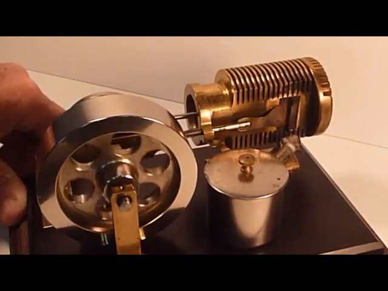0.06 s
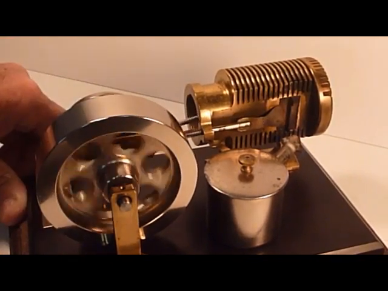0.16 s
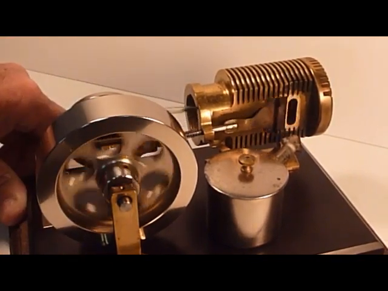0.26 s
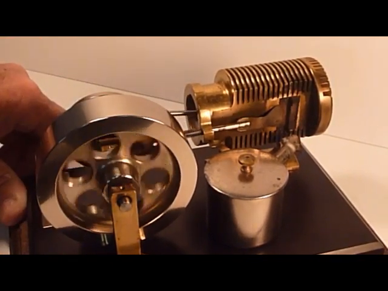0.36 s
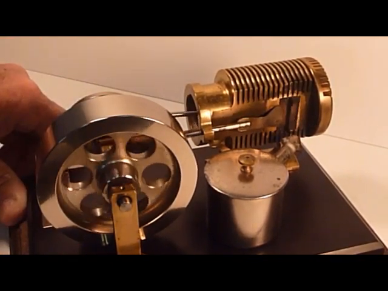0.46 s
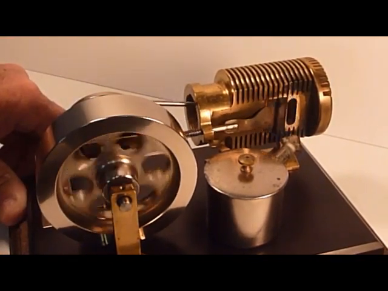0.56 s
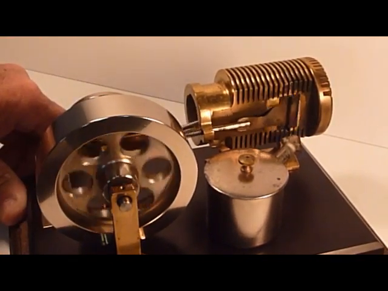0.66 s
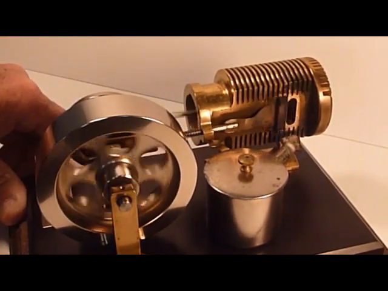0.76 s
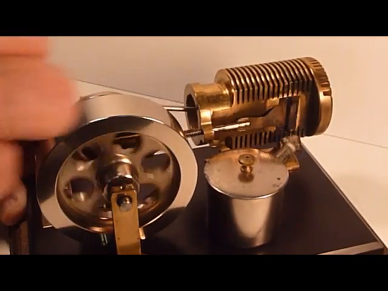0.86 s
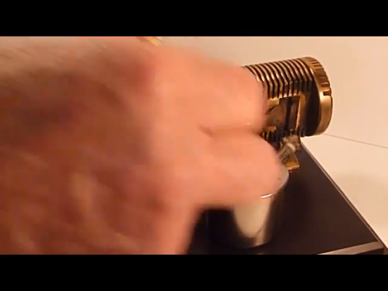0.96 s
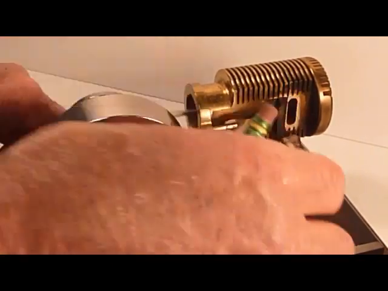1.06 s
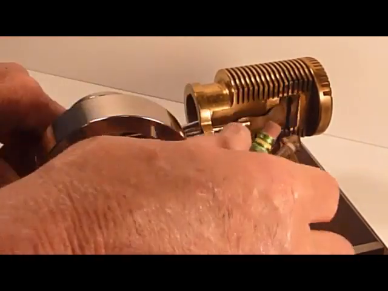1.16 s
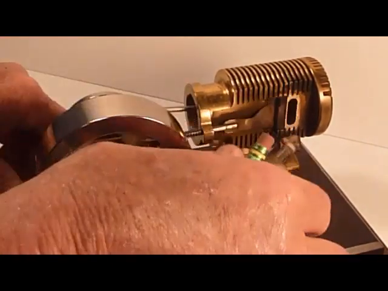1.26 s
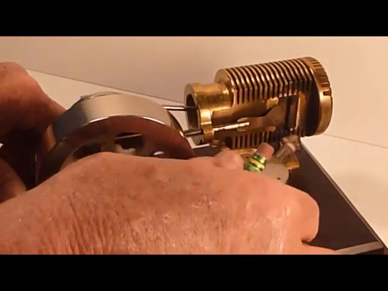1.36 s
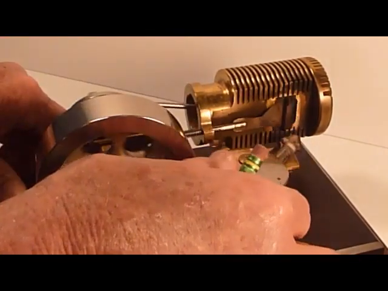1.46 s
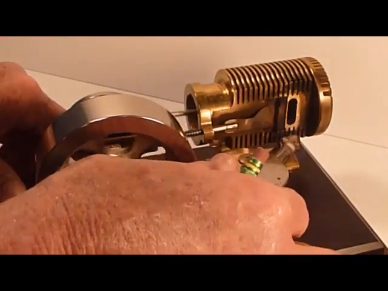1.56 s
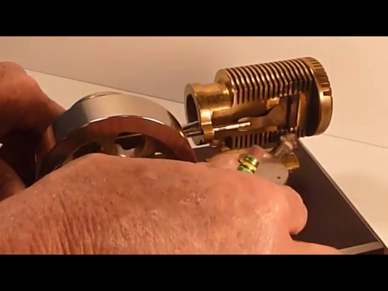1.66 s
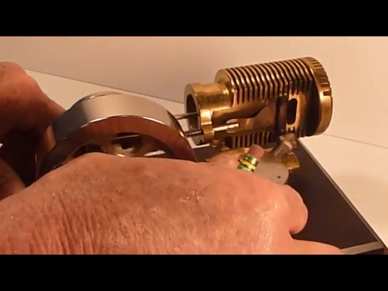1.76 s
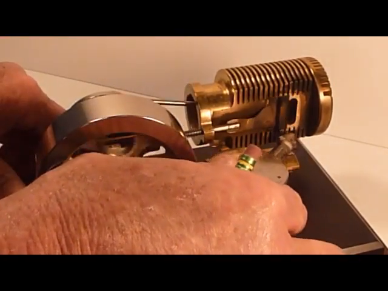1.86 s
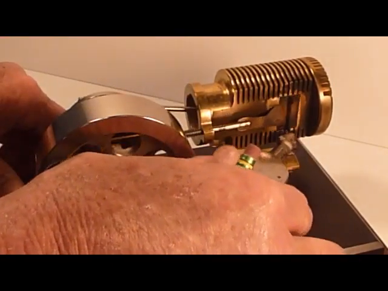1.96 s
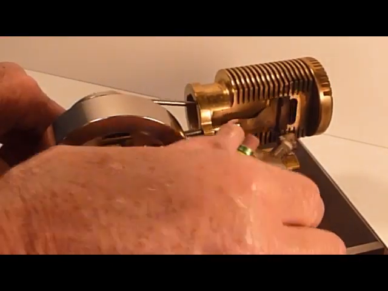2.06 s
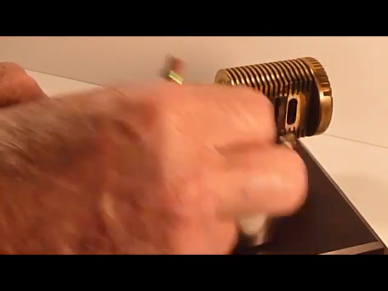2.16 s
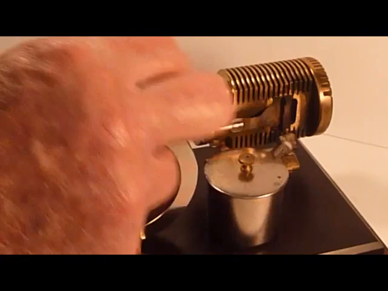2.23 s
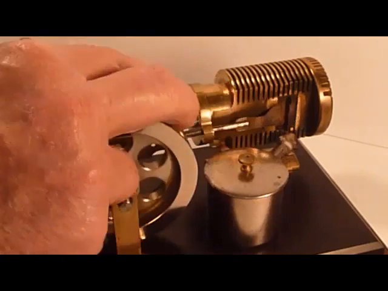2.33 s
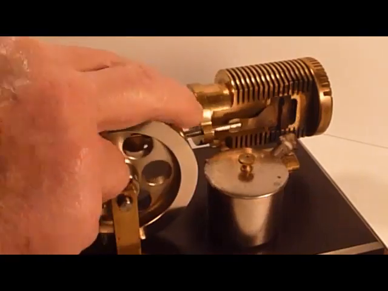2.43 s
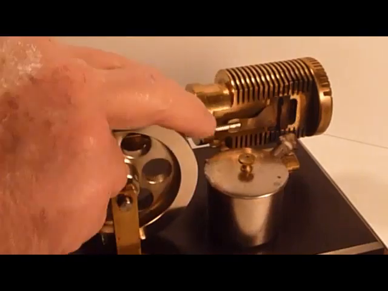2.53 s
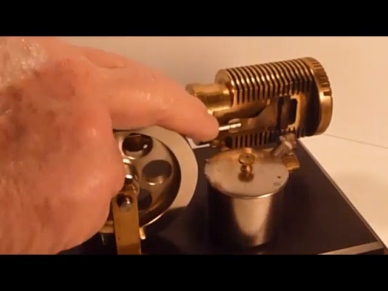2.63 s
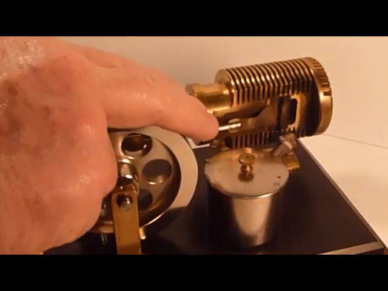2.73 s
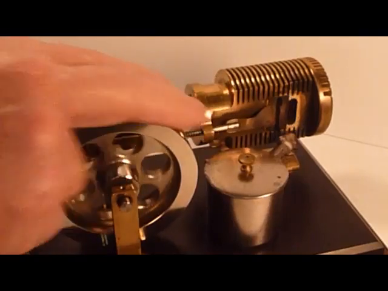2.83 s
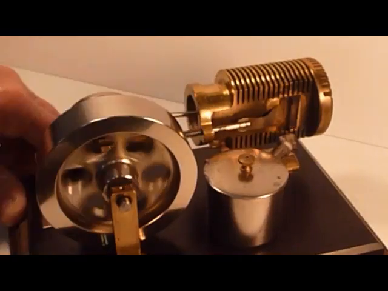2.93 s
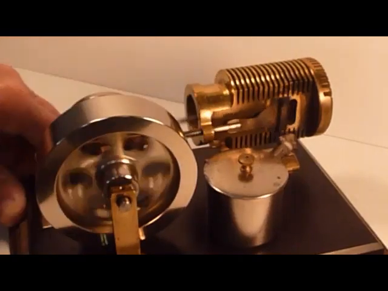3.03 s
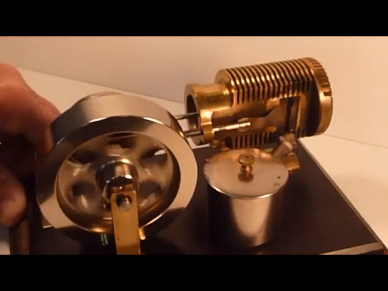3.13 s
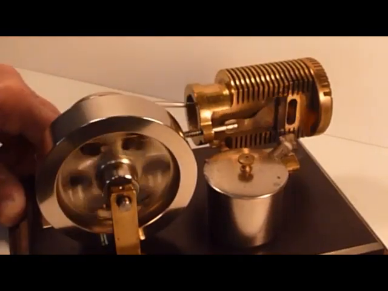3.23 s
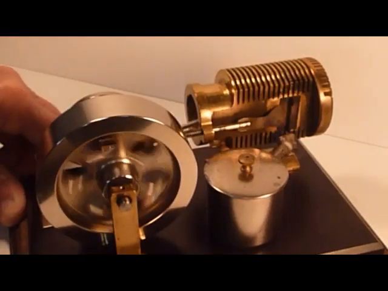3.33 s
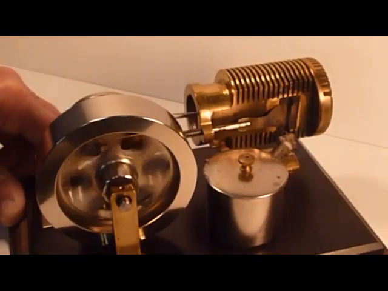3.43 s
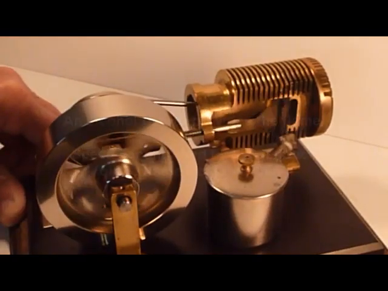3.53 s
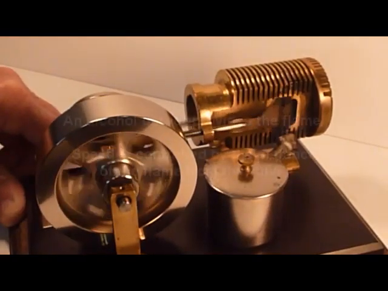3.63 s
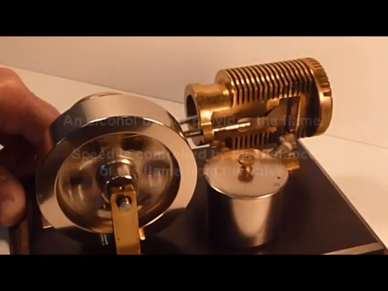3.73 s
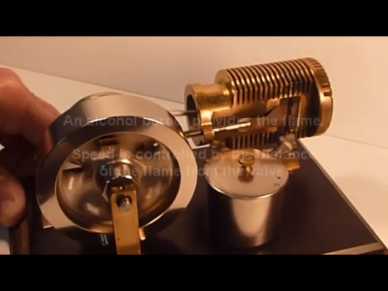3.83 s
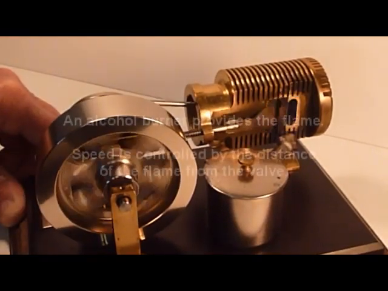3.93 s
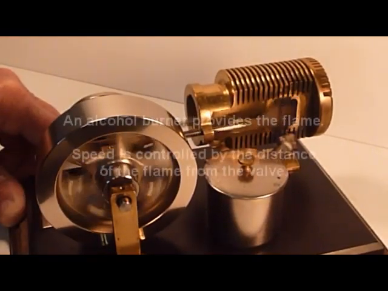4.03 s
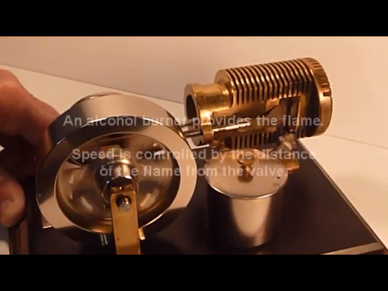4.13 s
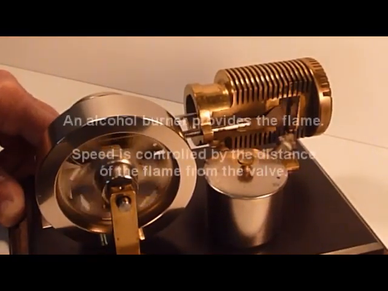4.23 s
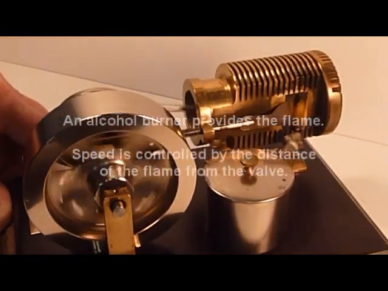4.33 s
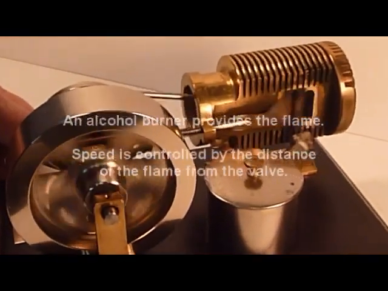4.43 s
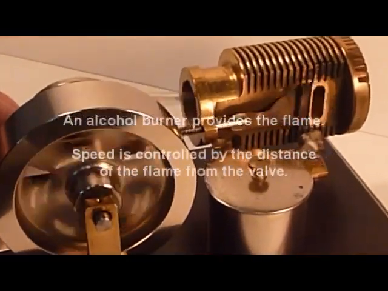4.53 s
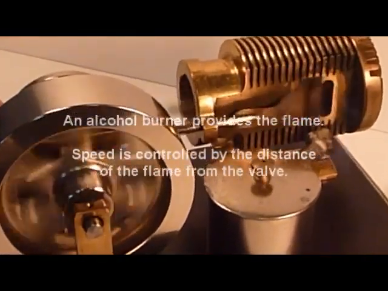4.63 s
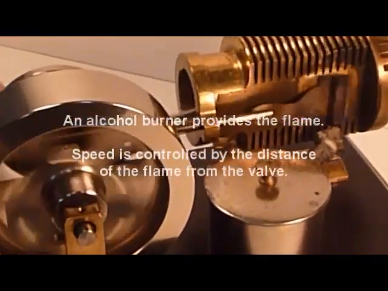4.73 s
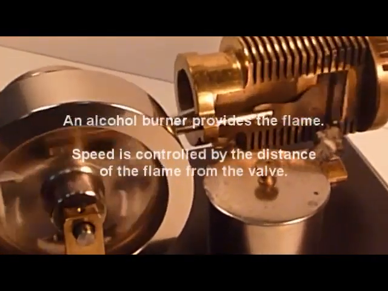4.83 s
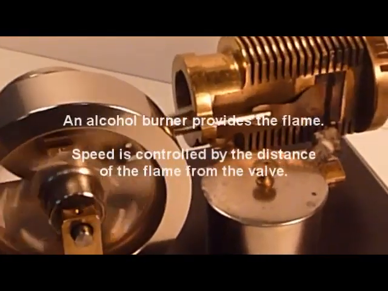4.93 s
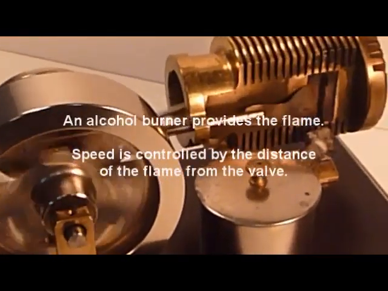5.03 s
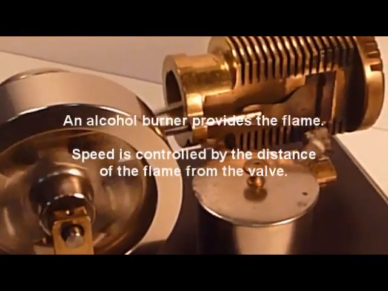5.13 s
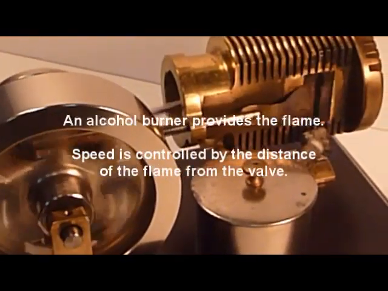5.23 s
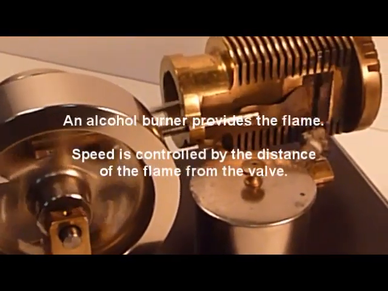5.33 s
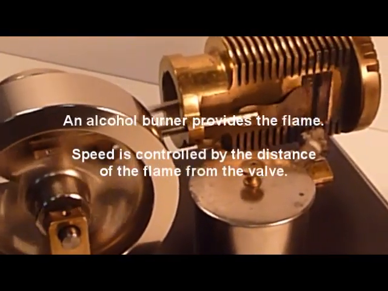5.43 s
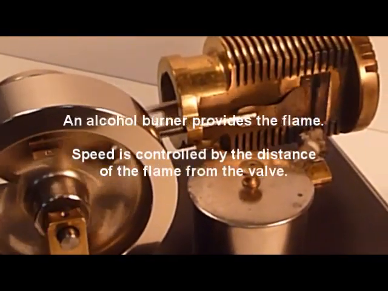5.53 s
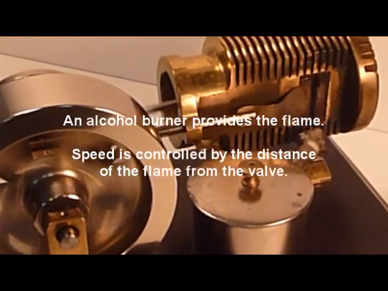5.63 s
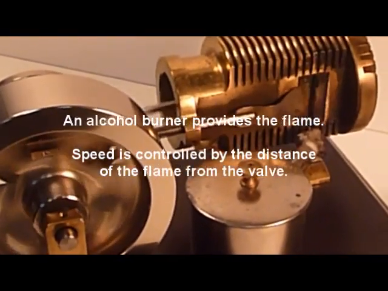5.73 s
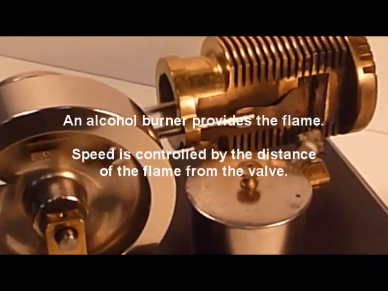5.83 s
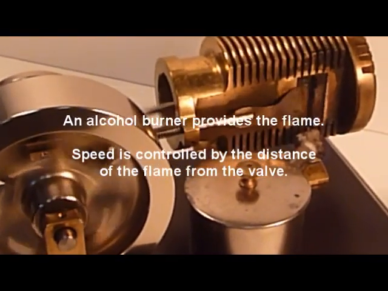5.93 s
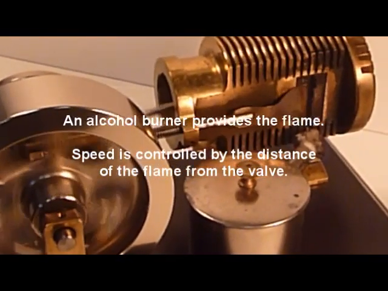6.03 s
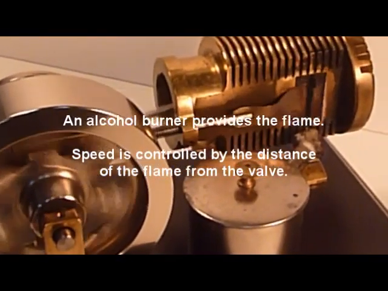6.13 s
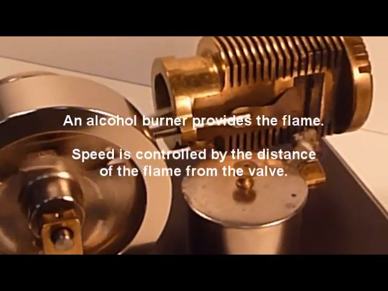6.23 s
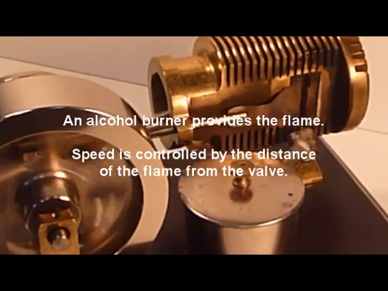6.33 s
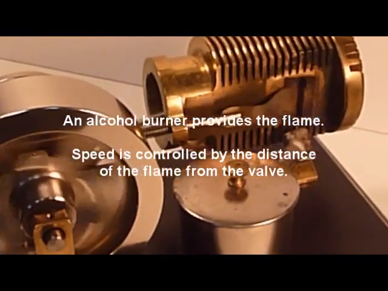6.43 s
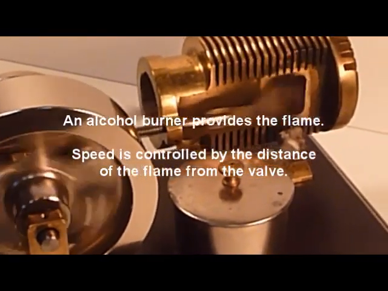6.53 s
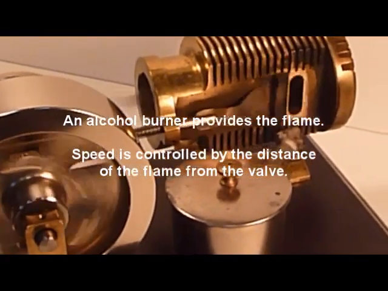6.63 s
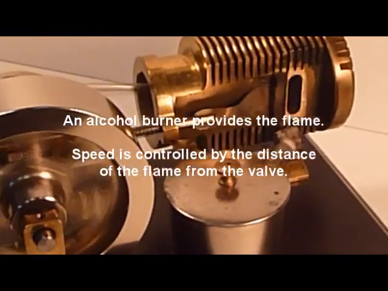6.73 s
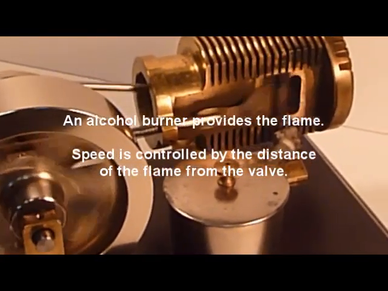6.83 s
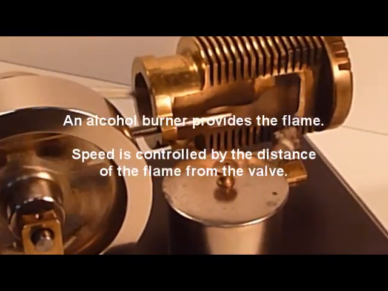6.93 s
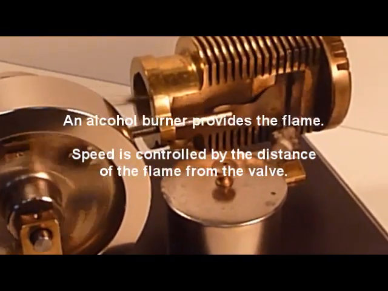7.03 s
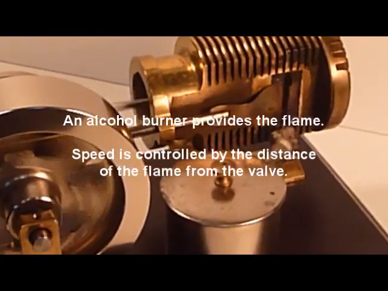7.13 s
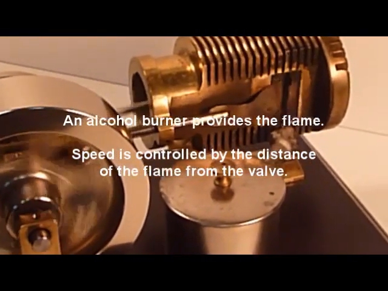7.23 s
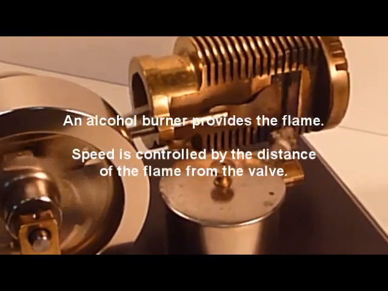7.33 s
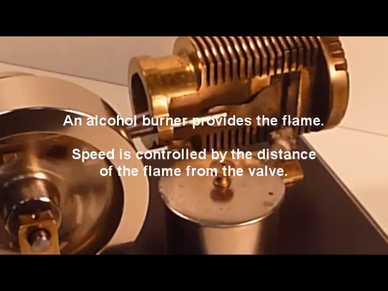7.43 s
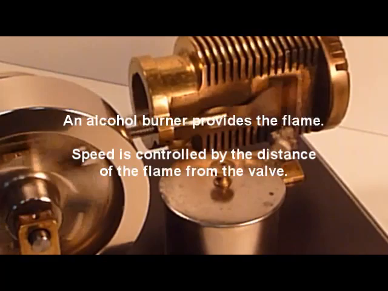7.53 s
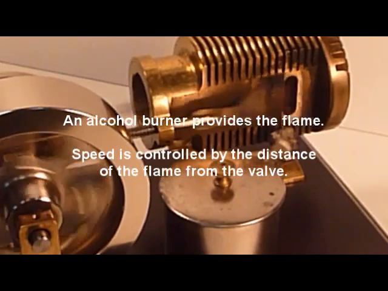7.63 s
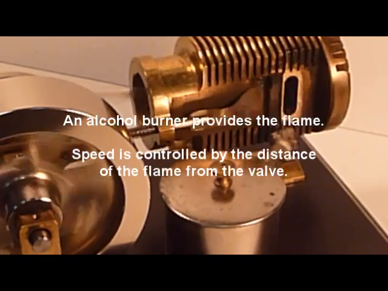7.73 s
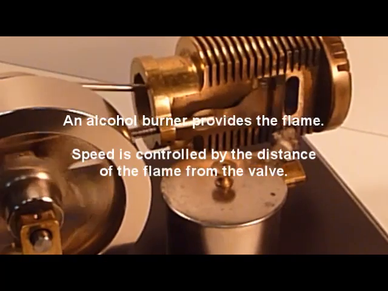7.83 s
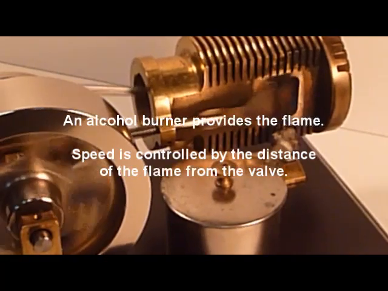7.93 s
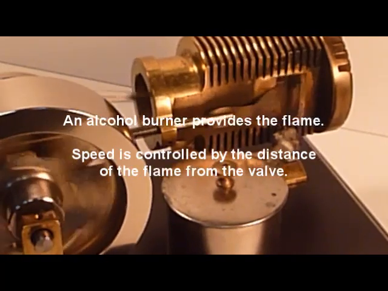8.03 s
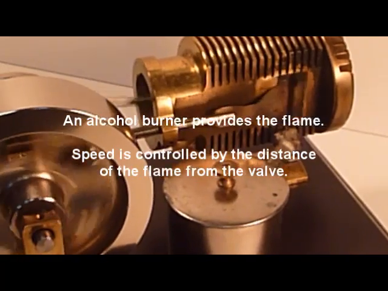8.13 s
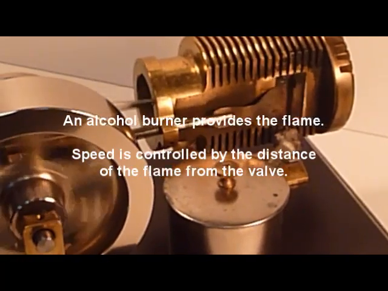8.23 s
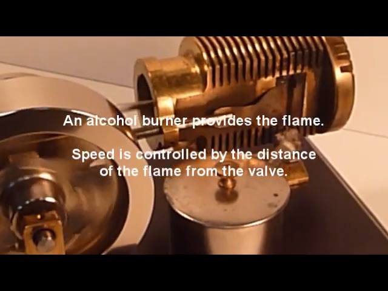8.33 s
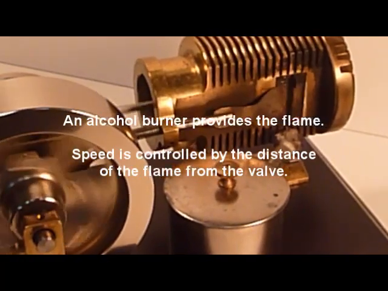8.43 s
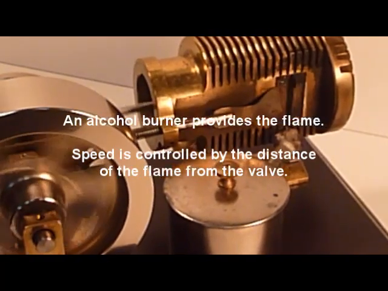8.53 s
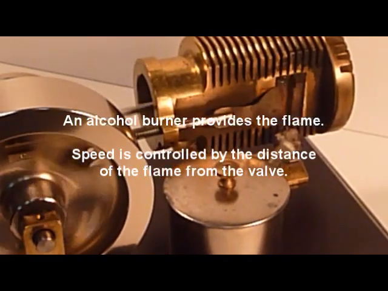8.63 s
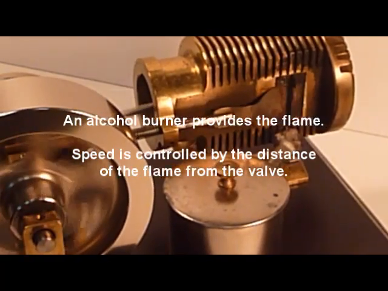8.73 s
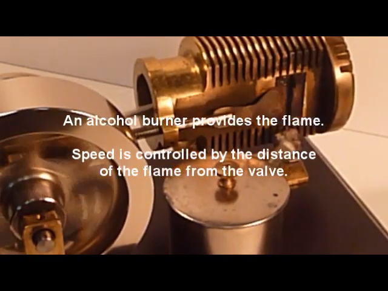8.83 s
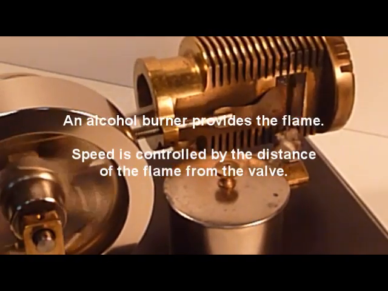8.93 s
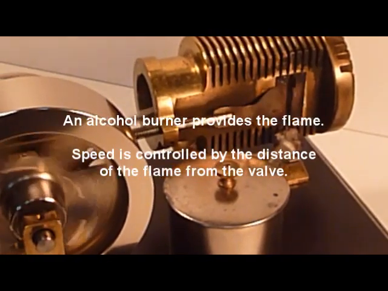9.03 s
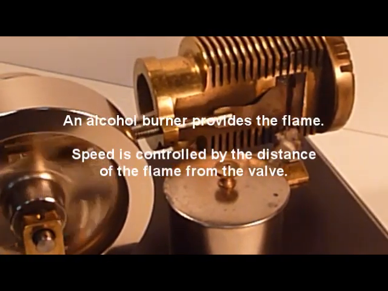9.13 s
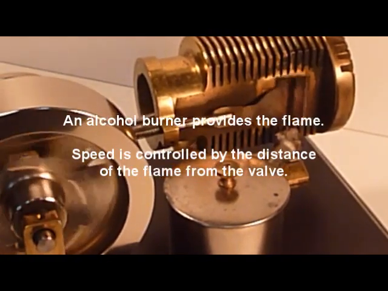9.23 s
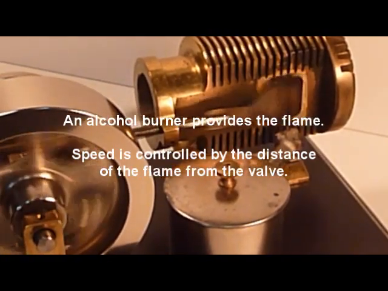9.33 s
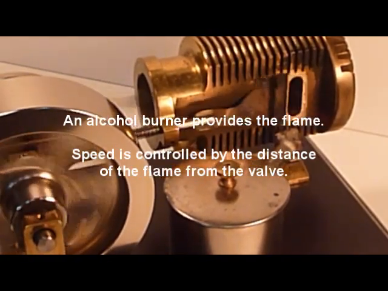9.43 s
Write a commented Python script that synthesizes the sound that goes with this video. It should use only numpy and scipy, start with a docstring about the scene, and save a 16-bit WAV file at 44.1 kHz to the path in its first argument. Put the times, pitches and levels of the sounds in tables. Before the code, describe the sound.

A small vacuum engine on a table, heard closely in a small humming room, slightly to the right. A loud, clipped air pop sounds at the very start and another at 0.33 s, with a faint hissing, whistling leak until about 1 s. Slow hand turns follow: dull gulps at 0.65, 1.11, 1.59 and 2.14 s alternate with quieter puffs at 0.85, 1.32 and 1.83 s; a weak gulp comes at 2.46 s. After a lull, a finger rubs the rim and low knocks cluster around 3 s. At 3.14 s the engine catches, popping five times a second, reaching eight by 4.2 s and about eleven from 6.4 s. Each pop is a hard crack with a tiny upward ring; between them come scrapes and high chirps around 3.3 kHz, strongest near 5 s. Pops gradually soften, with a slight slowing around 8.6 s, and running continues to the end at 9.5 s.

```python
"""A small flame-licker vacuum engine on a table: flicked over by hand, it thuds slowly, then catches and runs.
Once a turn the valve uncovers the port, air slams into the vacuum and the cylinder rings with a rising pitch.
Roughly half a turn later the valve gear chirps: a short gliding squeak with a noisy rasp.
Slow turns by hand add gulps, puffs, knocks and a hissing leak. Table and walls reflect the engine,
a low rumble and hum lines lie beneath, and the loudest swings flatten."""
import sys
import numpy as np
from scipy import signal
from scipy.fft import rfft, irfft, next_fast_len
from scipy.io import wavfile
from scipy.ndimage import map_coordinates

SR = 44100
rng = np.random.default_rng(int(sys.argv[2]) if len(sys.argv) > 2 else 0)


def generate_wav(sig):
    """Save sig (samples, or channels by samples) to the path in sys.argv[1] as 16-bit PCM at SR."""
    pcm = np.round(np.clip(np.atleast_2d(sig).T, -1, 1) * 32767).astype(np.int16)
    wavfile.write(sys.argv[1], SR, pcm)


N = 418068
LEAD = SR // 4  # samples of sound before time zero
TIME = (np.arange(N + LEAD) - LEAD) / SR
AGE = np.arange(SR // 10) / SR  # seconds since the start of one event

# Flywheel speed once the engine has caught. Each row: time in seconds, speed in turns a second.
FLYWHEEL_SPEED = [(3.138, 4.868), (3.3, 6.084), (3.69, 7.653), (3.75, 7.087), (4.22, 7.905), (4.95, 9.336),
                  (5.28, 9.712), (5.91, 10.008), (6.36, 10.545), (6.44, 10.832), (7.22, 10.939),
                  (7.56, 11.001), (8.17, 10.82), (8.34, 10.384), (8.67, 10.235), (9.13, 10.332),
                  (9.19, 10.644), (9.48, 10.967)]
CATCH_S = 3.1381
# The valve opens on the vacuum during the first flicks.
# Each row: start in seconds, relative level in dB, final ring pitch in Hz.
FLICKS = [(-0.03, 0, 1920), (0.327, -0.5, 1884)]
# Running, the pops weaken as the cylinder warms: level at the catch, loss, scatter from turn to turn.
POP_DB, POP_FADE_DB_PER_S, POP_SCATTER_DB = 0.45, 0.8, 0.69
# The ring's final pitch follows the heat of the gas that the flame supplies.
# Each row: time in seconds, pitch in Hz before the scatter.
GAS_RING = [(3.14, 2235), (3.35, 2830), (3.78, 2430), (4.4, 2700), (6.3, 2920), (8.03, 2814), (8.24, 2320),
            (8.52, 2840), (8.92, 2380), (9.2, 2780)]
RING_SCATTER = 0.035  # share of the pitch, from turn to turn
# Cylinder and port: on the whole the port opens more gently as the engine settles.
# Each row: time in seconds, port opening time in seconds, ring decay in seconds, relative crack level in dB.
CYLINDER = [(.33, 0.0005, 0.0015, -5), (3.14, 0.0007, 0.0014, -5), (3.75, 0.000836, 0.0014, -6),
            (4.5, 0.00076, 0.0012, -6), (5.7, 0.001, 0.0014, -14.5), (6.25, 0.000864, 0.0013, -7.5),
            (6.9, 0.00087, 0.0013, -14), (7.9, 0.00086, 0.0014, -12.5), (9.4, 0.00088, 0.0016, -29)]
# Spectrum of the air jet's crack. Each row: frequency in Hz, relative level in dB.
CRACK_COLOUR = [(300, 1.5), (1500, 3.5), (3800, 11), (5500, -21), (8000, -37.5), (11000, -33),
                (16000, -47.5)]
# Spectrum of rasps, rubbing and short hisses. Each row: frequency in Hz, relative level in dB.
RASP_COLOUR = [(1000, -20.5), (2500, 9.5), (3600, -1), (5000, -0.5), (6800, -10), (8000, -36.5),
               (9500, -22.5), (13000, -57)]
# Echoes off nearby surfaces. Each row: delay in seconds, signed gain against the direct sound.
NEAR_ECHOES = [(.00035, -1.1), (.00077, -0.83), (.00158, 0.07), (.00268, .51), (.0061, -0.14)]
# Gaps in the sound that engine and table send out. Each row: centre in Hz, width in Hz, depth from 0 to 1.
NOTCHES = [(947, 206, 0.65), (1472, 177, 0.49), (1628.5, 143, 0.66), (2271, 176, 0.98)]
# Modes of the table and the engine's base. Each row: pitch in Hz, decay in seconds, level against the pop in dB.
TABLE_MODES = [(276, 0.019, -43), (362, 0.032, -35.5), (384, .018, -29.5), (486, 0.028, -26),
               (598, 0.0091, -43), (686, 0.011, -24), (726, .02, -34), (1208, 0.012, -35.5),
               (1276, 0.016, -32), (1490, 0.016, -41), (2050, 0.01, -39), (2440, 0.015, -34)]
# The valve gear. Each row: time in seconds, chirp level in dB, settled chirp pitch in Hz,
# rasp over the chirp in dB, relative level in dB of the scrape and rubbing.
GEAR = [(3.4, -53, 3290, -5, -38.5), (3.56, -30.5, 3280, -7, -39), (4.3, -23, 3280, -7.5, -34),
        (5.3, -18.5, 3350, -10, -34), (6.5, -21, 3414, -10.5, -33), (8, -25.5, 3386, -7, -32.5),
        (9.4, -27, 3355, -8.5, -35)]
# The cam lets the valve go part of a turn after each pop; its spring needs a fixed time to shut it.
RELEASE_TURNS, SHUT_S = 0.327, 0.0266
CHIRP_SCATTER_DB = 1
# The rod that works the valve rings on: level against the chirp, decay.
ROD_DB, ROD_DECAY_S = -20.5, 0.04
# Trapped air lifts the valve on slow turns. Each row: start in seconds, relative level in dB.
PUFFS = [(0.8479, -16.5), (1.3194, -14.5), (1.833, -15)]
# On slow turns only a weak vacuum forms, and air gulps in.
# Each row: start in seconds, relative level in dB, cylinder ring over that level in dB.
GULPS = [(0.654, -4.5, -7.5), (1.112, -2.5, -9.5), (1.5872, -2, -11.5), (2.1393, -6, -20),
         (2.4607, -17, -10.5)]
# Spectrum of the gulp's hiss. Each row: frequency in Hz, relative level in dB.
GULP_COLOUR = [(500, 5.0), (1500, 1.5), (2500, 6.0), (3300, -7.0), (6500, -0.5), (7500, -35.5),
               (10000, -19.0), (12000, -52)]
# Dull knocks while the hand works the flywheel. Each row: start in seconds, level in dB.
BUMPS = [(2.969, -14), (3.015, -15.5), (3.038, -10.5), (3.068, -17.5)]
# Air leaks past the piston. Each row: time in seconds, level in dB before its wobble.
LEAK = [(0, -78), (.12, -60), (.3, -45), (.37, -65), (.48, -44.5), (.82, -47.5), (.93, -47.5), (1, -66),
        (1.2, -90)]
# Spectrum of the leak. Each row: frequency in Hz, relative level in dB.
LEAK_COLOUR = [(1000, -20.5), (1700, -5.5), (1830, 4), (2000, -13.5), (2550, -10), (2720, 5.5),
               (2900, -17.5), (4200, -14.5), (5500, -20), (6400, -11.5), (7200, -46), (10000, -32.5),
               (12000, -66.5)]
# The leak whistles faintly. Each row: pitch in Hz, level over the leak in dB before its wobble.
WHISTLES = [(1835, -12.5), (2690, -10)]
# A finger slides off the flywheel rim as it gives the last push. Each row: time in seconds, level in dB.
FINGER = [(2.93, -90), (2.965, -47), (2.99, -56), (3.1, -45), (3.14, -57), (3.17, -90)]
# Reverberation of the room. Each row: frequency in Hz, time in seconds to fall by 60 dB.
ROOM_T60 = [(150, 0.63), (500, 0.49), (2000, 0.49), (4000, 1), (10000, 0.47)]
# Stereo width of the room. Each row: frequency in Hz, left-right likeness from 0 to 1.
ROOM_ALIKE = [(300, 0.99), (700, 0.97), (1500, 0.74), (4000, 0.14), (10000, 0.12)]
# Balance between the ears. Each row: frequency in Hz, right minus left in dB.
TILT = [(100, -0.16), (600, 1.5), (1200, 2), (2200, 4.5), (4000, 1), (10000, -3.5)]
# Level of the rumble and hum as heard, lower while the engine runs.
# Each row: time in seconds, relative level in dB.
AMBIENT = [(0, -38.5), (0.7, -35.5), (3.05, -35), (3.3, -37.5), (5.7, -38.7), (6.4, -42.5), (8.2, -43.5),
           (9.48, -44)]
# Spectrum of the rumble. Each row: frequency in Hz, relative level in dB.
AMBIENT_COLOUR = [(15, -45.5), (25, -33), (60, -18), (112, -9.5), (146, -13.5), (203, -1), (246, -7),
                  (277, -0.5), (305, -8.5), (515, -12.5), (553, -11), (670, -16), (1080, -23.5),
                  (1160, -25.5), (3470, -35), (7430, -52.5), (9660, -97.5), (16300, -120)]
# Hum lines. Each row: pitch in Hz, relative level in dB.
HUM = [(119, -46), (205, -53), (274.5, -41)]


def amp(db):
    """Decibels to a linear gain."""
    return 10 ** (np.asarray(db) / 20)


def unit(x):
    """Scale to an RMS of one."""
    return x / np.sqrt(np.mean(x ** 2) + 1e-20)


def along(points, hz):
    """Read (Hz, value) points on a log frequency axis."""
    f, v = np.transpose(points)
    return np.interp(np.log(hz + 1), np.log(f), v)


def at(rows, s):
    """Every column of a curve at the time s."""
    times, *cols = np.transpose(rows)
    return [np.interp(s, times, c) for c in cols]


def wobble(rate):
    """A smooth random curve, rate knots a second."""
    knots = rng.standard_normal(int(len(TIME) * rate / SR) + 4)
    return map_coordinates(knots, [np.arange(len(TIME)) * rate / SR])


def filtered(x, response):
    """x times a complex response of frequency."""
    n = x.shape[-1]
    m = next_fast_len(n + 8192)
    return irfft(rfft(x, m) * response(np.fft.rfftfreq(m, 1 / SR)), m)[..., :n]


def noise(colour, envelope=1):
    """White noise shaped by an envelope, then by a (Hz, dB) spectrum of unit power."""
    white = envelope * rng.standard_normal(len(TIME))
    return filtered(white, lambda hz: unit(amp(along(colour, hz))))


def add(track, s, sound):
    """Mix a sound into a track at the time s."""
    part = track[max(round(s * SR) + LEAD, 0):][:len(sound)]
    part += sound[:len(part)]


def swell(length):
    """One smooth rise and fall."""
    return np.sin(np.pi * np.minimum(AGE / length, 1))


def fade(decay):
    """An exponential decay."""
    return np.exp(-AGE / decay)


def ringing(hz, decay):
    """One damped mode."""
    return np.sin(2 * np.pi * hz * AGE) * fade(decay)


def gliding(pitch):
    """A sine that follows a changing pitch."""
    return np.sin(2 * np.pi * np.cumsum(pitch) / SR)


def crank_times(offset):
    """The moments at which the crank stands a given share of a turn past the valve's opening."""
    t = np.arange(CATCH_S, N / SR, 1 / SR)
    turns = np.cumsum(at(FLYWHEEL_SPEED, t)[0]) / SR
    return np.interp(np.arange(offset, turns[-1]), turns, t)


def firings():
    """Rows (s, relative dB, final ring Hz): the first flicks, then one pop a turn."""
    s = crank_times(0)
    a, b = rng.standard_normal((len(s), 2)).T
    db = POP_DB - POP_FADE_DB_PER_S * (s - CATCH_S) + POP_SCATTER_DB * a
    final_hz = at(GAS_RING, s)[0] * (1 + RING_SCATTER * b)
    return np.vstack([FLICKS, np.column_stack([s, db, final_hz])])


def pops(fired, bend=2.02, crack_s=0.0011, hiss_db=-33, valve_hz=3550, valve_db=-3, valve_decay=0.00067):
    """Air slams into the cylinder, whose ring climbs in pitch as the port opens."""
    ring, crack, hiss = np.zeros((3, len(TIME)))
    for (s, db, final_hz), (b, c) in zip(fired, rng.standard_normal((len(fired), 2))):
        opening, decay, crack_db = at(CYLINDER, s)
        opening *= np.exp(0.075 * b)
        pitch = final_hz * (1 - fade(opening)) ** bend
        add(ring, s, amp(db + 4.0) * gliding(pitch) * fade(decay))
        # the jet through the port cracks and shakes the valve plate
        jet = amp(db + crack_db + 1.3 * c)
        add(crack, s + .0008, jet * amp(-9.5) * fade(crack_s))
        plate = ringing(valve_hz, valve_decay) * (1 - fade(0.00024))
        add(ring, s + 0.000816, jet * amp(valve_db) * plate)
        # air seeps in just before the valve is clear
        add(hiss, s - .003, amp(db + hiss_db) * swell(0.0062))
    return ring + noise(CRACK_COLOUR, crack) + noise(RASP_COLOUR, hiss)


def surfaces(x):
    """Engine base, table and wall return the sound within a few milliseconds and cancel some pitches."""
    def echoes(hz):
        return 1 + sum(gain * np.exp(-2j * np.pi * hz * delay) for delay, gain in NEAR_ECHOES)

    def gaps(hz):
        total = 1
        for centre, width, depth in NOTCHES:
            damping = 1j * hz * width
            total = total * (1 - depth * damping / (centre ** 2 - hz ** 2 + damping))
        return total

    return filtered(x, lambda hz: echoes(hz) * gaps(hz))


def high_passed(x, corner_hz):
    """A second-order cut of the bass."""
    return signal.sosfilt(signal.butter(2, corner_hz, "highpass", fs=SR, output="sos"), x)


def radiated(x, corner_hz):
    """So small a source sends out little bass."""
    return high_passed(x, corner_hz)


def table(fired):
    """The suction of each pop tugs the table and the engine's base into ringing."""
    out = np.zeros(len(TIME))
    ring = sum(amp(db) * ringing(hz, decay) for hz, decay, db in TABLE_MODES)
    for s, db, _ in fired:
        add(out, s + 0.00085, -amp(db) * ring)
    return out


def valve_gear(fired, length=0.0047, rebound_s=0.018, rebound_db=-10.5):
    """The sliding valve squeaks for a few milliseconds and rebounds; the cam scrapes after each pop."""
    tone, rasp = np.zeros((2, len(TIME)))
    shuts = crank_times(RELEASE_TURNS) + SHUT_S
    for s, draws in zip(shuts, rng.standard_normal((len(shuts), 2, 4))):
        db, hz, rasp_db, _ = at(GEAR, s)
        for (lag, drop_db), (a, b, c, d) in zip([(0, 0), (rebound_s, rebound_db)], draws):
            slide = amp(db + drop_db + CHIRP_SCATTER_DB * c) * swell(length * np.exp(0.28 * b))
            # the squeak starts off pitch and settles
            pitch = hz * (1 + 0.004 * a + (0.086 + .025 * d) * fade(0.0017))
            add(tone, s + lag, slide * gliding(pitch))
        add(tone, s, amp(db + ROD_DB) * ringing(hz, ROD_DECAY_S))
        add(rasp, s, amp(db + rasp_db) * fade(0.0028))
    for (s, *_), (a, b) in zip(fired, rng.standard_normal((len(fired), 2))):
        scrape = amp(at(GEAR, s)[-1] + 3.5 + 2.9 * b)
        add(rasp, s + .0165 + .001 * a, scrape * (1 - fade(0.000093)) * fade(0.0033))
    # piston and bearings rub all the while
    rasp += amp(at(GEAR, TIME)[-1] - 22.5 + 2.7 * wobble(70))
    return tone + noise(RASP_COLOUR, rasp)


def puffs(decay=0.00088, rasp_db=-19):
    """A sharp push of escaping air with a short hiss."""
    push, hiss = np.zeros((2, len(TIME)))
    for s, db in PUFFS:
        add(push, s, amp(db + 7.5) * (1 - fade(0.00022)) * fade(decay))
        add(hiss, s, amp(db + rasp_db) * fade(0.0046))
    return push + noise(RASP_COLOUR, hiss)


def gulps(rise_s=0.0017, suck_s=0.00087, ring_hz=1220, ring_decay=0.0031, hiss_db=-22,
          table_hz=470, table_db=-15):
    """Air seeps in with a growing hiss until the flow stops short; cylinder and table ring faintly."""
    air, hiss = np.zeros((2, len(TIME)))
    for s, db, ring_db in GULPS:
        stop = s + rise_s
        add(air, s, amp(db - 4.5) * swell(rise_s))
        # the pressure drops as the flow stops, then swings back
        add(air, stop, -amp(db + 8.0) * (1 - fade(0.00054)) * fade(suck_s))
        add(air, stop + 0.0011, amp(db - 12) * swell(0.0031))
        add(air, stop, amp(db + ring_db) * ringing(ring_hz, ring_decay))
        add(air, stop, amp(db + table_db) * ringing(table_hz, 0.012))
        add(hiss, s - .001, amp(db + hiss_db) * swell(0.0058))
    return air + noise(GULP_COLOUR, hiss)


def bumps(base_hz=215, decay=0.0056):
    """The engine's base rocks on the table: one short low damped mode for each knock."""
    out = np.zeros(len(TIME))
    for s, db in BUMPS:
        add(out, s, amp(db) * ringing(base_hz, decay))
    return out


def leak():
    """Air hisses and whistles past the piston as the hand turns the wheel, and a finger rubs the rim."""
    whistle = 0
    for hz, db in WHISTLES:
        level = amp(db + 2.5 * wobble(40))
        whistle = whistle + level * np.sin(2 * np.pi * hz * TIME + 1.1 * wobble(70))
    level = amp(at(LEAK, TIME)[0] + 1.2 * wobble(25))
    piston = level * (noise(LEAK_COLOUR) + whistle)
    return piston + noise(RASP_COLOUR, amp(at(FINGER, TIME)[0]))


def sideways(x, side_db=-16, delay_s=0.001053, corner_hz=1100):
    """A wall to one side returns the treble with opposite sign to left and right."""
    def delayed_treble(hz):
        return np.exp(-2j * np.pi * hz * delay_s) * hz ** 2 / (hz ** 2 + corner_hz ** 2)

    echo = filtered(x, delayed_treble)
    return amp(side_db) * np.array([echo, -echo])


def spread(pair):
    """Two unrelated signals become left and right, nearly alike in the bass."""
    def mid_side(hz):
        turn = np.arccos(np.clip(along(ROOM_ALIKE, hz), -1, 1)) / 2
        return np.array([np.cos(turn), np.sin(turn)])

    mid, side = filtered(pair, mid_side)
    return np.array([mid + side, mid - side])


def room(x, early_db=-11, early_t60=0.062, early_corner_hz=900, late_db=-15, gap=0.003972, absorb_hz=2950,
         treble_share=0.51):
    """A short, dense early scatter, kept above the bass, joins a small room's tail; walls soak up treble."""
    # the tail: noise that dies away at its own rate in each frequency band
    hz, t, z = signal.stft(rng.standard_normal((2, SR // 2)), SR, nperseg=256)
    dying = amp(-60 * t / along(ROOM_T60, hz)[:, None])
    late = signal.istft(z * dying, SR, nperseg=256)[1]
    age = np.arange(late.shape[1]) / SR
    early = high_passed(rng.standard_normal(late.shape) * amp(-60 * age / early_t60), early_corner_hz)
    parts = [(early_db, early), (late_db, late)]
    answer = sum(amp(db) * part / np.linalg.norm(part[0]) for db, part in parts)

    def absorption(hz):
        return treble_share + (1 - treble_share) / (1 + (hz / absorb_hz) ** 16)

    answer = filtered(spread(answer), absorption)
    answer = np.pad(answer, ((0, 0), (round(gap * SR), 0)))
    return signal.fftconvolve(x[None], answer, axes=1)[:, :len(x)]


def ambient(rumble_db=1, hum_db=35):
    """A low rumble of shaped noise, with hum lines that waver in level and phase."""
    rumble = unit(spread(np.array([noise(AMBIENT_COLOUR), noise(AMBIENT_COLOUR)])))
    hum = 0
    for hz, db in HUM:
        level = amp(db + 0.92 * wobble(6.3)) * np.sqrt(2)
        hum = hum + level * np.sin(2 * np.pi * hz * TIME + .7 * wobble(6.7))
    return amp(at(AMBIENT, TIME)[0]) * (amp(rumble_db) * rumble + amp(hum_db) * hum)


def scene():
    """The engine on its table in a humming room, the sound leaning a little to the right."""
    fired = firings()
    running = radiated(surfaces(pops(fired)), corner_hz=223) + table(fired) + valve_gear(fired)
    by_hand = radiated(surfaces(puffs()) + gulps() + bumps(), corner_hz=82.5) + leak()
    engine = running + by_hand
    heard = engine + sideways(engine) + room(engine) + ambient()
    heard = filtered(heard, lambda hz: amp(np.outer([-.5, .5], along(TILT, hz))))
    return heard[:, LEAD:]


def record(dry):
    """The loudest swings flatten at full scale; the top octave is dull, with a steep end at 16 kHz."""
    clipped = dry / (1 + dry ** 8) ** (1 / 8)
    return filtered(clipped, lambda hz: 1 / (1 + (hz / 13500) ** 6) / (1 + (hz / 16000) ** 40))


dry = scene()
out = record(dry)
generate_wav(out)
```